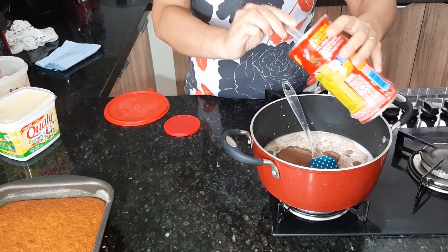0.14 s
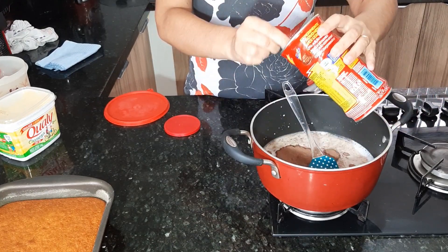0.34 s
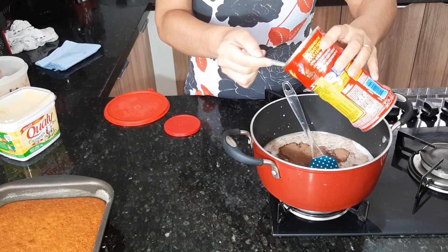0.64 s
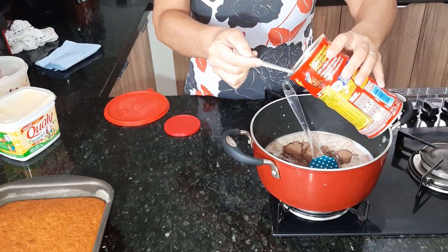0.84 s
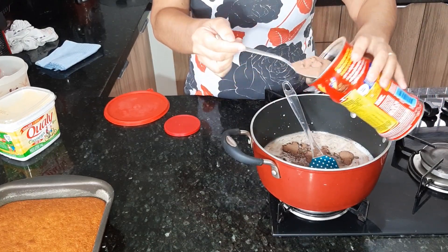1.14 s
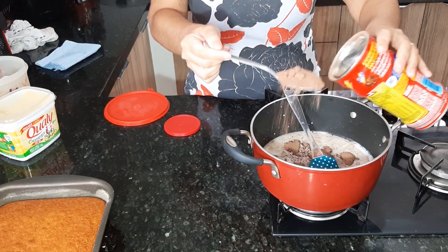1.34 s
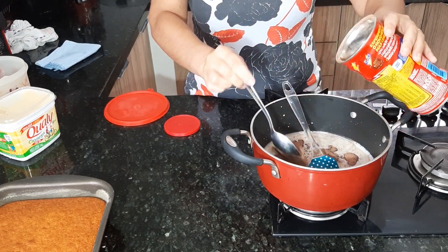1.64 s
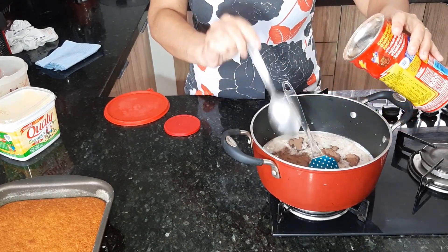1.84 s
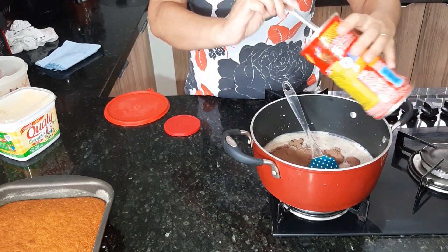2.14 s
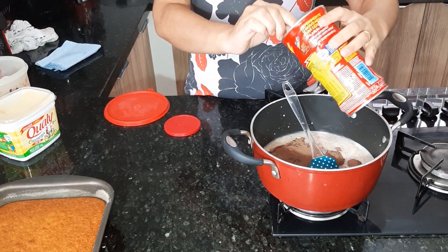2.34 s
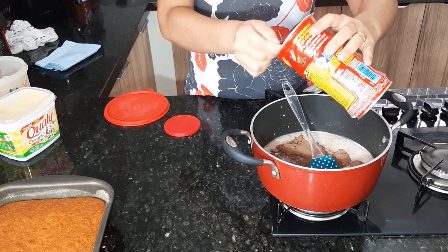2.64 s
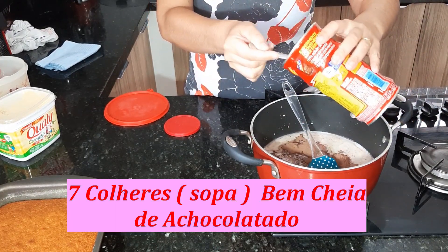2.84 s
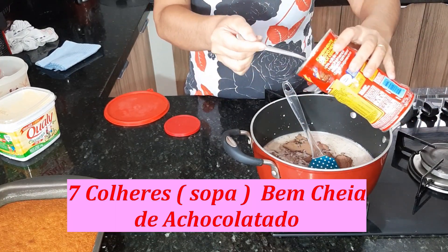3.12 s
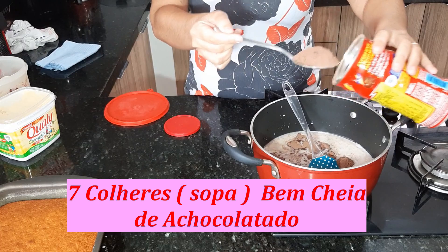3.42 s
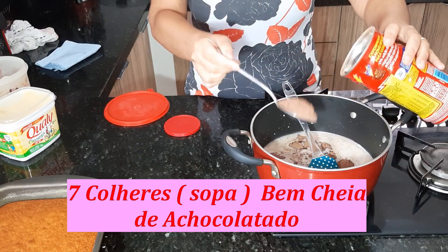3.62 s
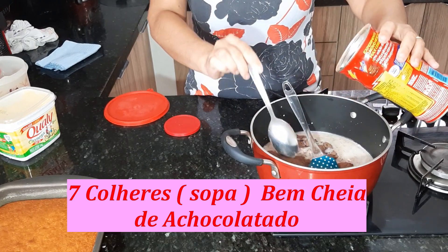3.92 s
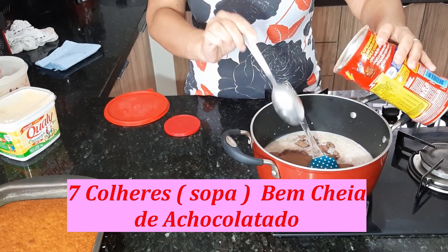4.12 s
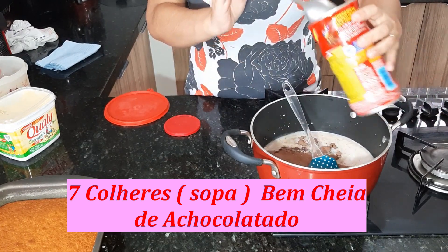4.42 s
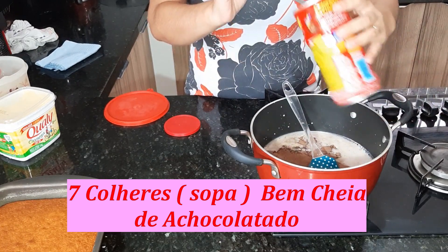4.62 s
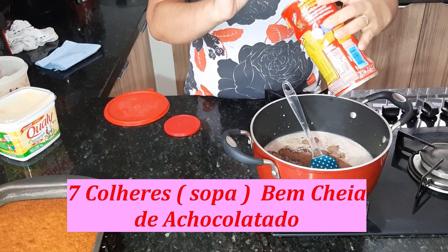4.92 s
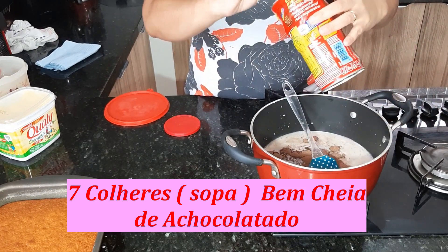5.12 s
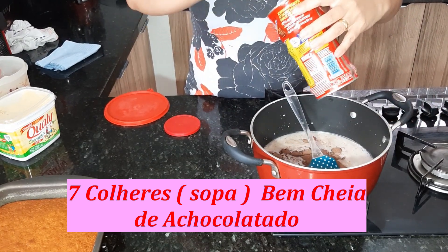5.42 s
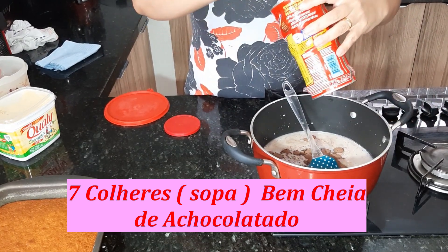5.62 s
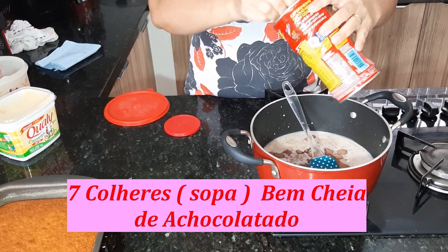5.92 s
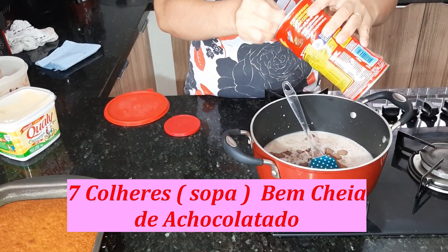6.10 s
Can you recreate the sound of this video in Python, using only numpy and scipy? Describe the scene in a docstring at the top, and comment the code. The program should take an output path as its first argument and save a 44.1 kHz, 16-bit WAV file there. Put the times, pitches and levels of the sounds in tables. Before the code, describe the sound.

A steel spoon digs crunchy powder from a hand-held tin, knocks its base, pauses, clinks once, and scoops again in a humming kitchen.

```python
"""A steel spoon digs cocoa powder out of a hand-held tin in a hard-walled kitchen.
It crunches through the powder and knocks the wall, then the base, and digs again.
After a pause it clinks once on the way in, touches the rim, and digs on to the end.
Touches and grains of friction drive the resonances of tin and spoon; a synthetic room response rings after each.
Filtered noise and a wavering sine make the room air and the humming appliance underneath."""
import sys
import numpy as np
from scipy import signal
from scipy.fft import rfft, irfft, next_fast_len
from scipy.io import wavfile
from scipy.ndimage import uniform_filter1d

SR = 44100
rng = np.random.default_rng(int(sys.argv[2]) if len(sys.argv) > 2 else 0)


def unload_wav(signal):
    """Save mono or channel-first audio to the path in sys.argv[1] as 16-bit WAV at rate SR, clipped to [-1, 1]."""
    wavfile.write(
        sys.argv[1],
        SR,
        np.round(np.clip(np.atleast_2d(signal).T, -1, 1) * 32767).astype(np.int16),
    )


N = 276058
TIME = np.arange(N) / SR
SWING_S = 0.00692  # the thump of the base comes this long after the tick

# tin resonances: centre_hz, width_hz, level_db
TIN_MODES = [(137, 14, -16), (212, 30, -5), (366, 35, -9), (418, 45, -3), (484, 45, 0), (562, 30, -11),
             (680, 40, -9), (800, 35, -14), (895, 30, -7), (945, 50, -8), (1120, 45, -17), (1425, 50, -11),
             (1670, 40, -12), (1850, 80, -22), (1988, 22, -12), (2065, 35, -9), (2200, 60, -16),
             (2420, 60, -23), (2970, 50, -19), (3355, 36, -6), (3490, 55, -13)]
# spectrum of crunching powder: freq_hz, density_db_per_hz
POWDER_SPECTRUM = [(710, -6), (1200, -2), (1380, -9), (2030, -8.5), (2490, -12.5), (2870, -3), (3480, -2.5),
                   (4230, -6.5), (4710, -7), (6780, -4), (8230, -12), (12900, -5), (15700, -8)]
# spectrum of a sharp crack: freq_hz, density_db_per_hz
CRACK_SPECTRUM = [(300, -9), (1150, 2.5), (1800, 1), (2600, 2), (3400, -1), (4300, -1), (5600, 0),
                  (6800, -3), (8500, -10), (15500, -8.5)]


def undb(db):
    """Decibels to gain."""
    return 10 ** (np.asarray(db) / 20)


def unit(x):
    """Scale to rms 1."""
    return x / np.sqrt(np.mean(x ** 2) + 1e-20)


def burst(x, db):
    """Scale a short sound so that its energy equals 20 ms at this rms level."""
    energy = np.sum(x ** 2)
    return x * undb(db) * np.sqrt(SR / 50 / energy)


def at_hz(points, hz):
    """Interpolate (Hz, value) points on a log-frequency axis."""
    point_hz, value = np.transpose(points)
    return np.interp(np.log(hz + 1e-3), np.log(point_hz), value)


def colour(x, points):
    """Minimum-phase filter with the given (Hz, dB) response, built by folding the cepstrum."""
    size = next_fast_len(x.shape[-1] + 4096, True) // 2 * 2
    response_db = at_hz(points, np.fft.rfftfreq(size, 1 / SR))
    cepstrum = irfft(np.log(undb(response_db)))
    cepstrum[1:size // 2] *= 2
    cepstrum[size // 2 + 1:] = 0
    response = np.exp(rfft(cepstrum))
    return irfft(rfft(x, size) * response)[..., :x.shape[-1]]


def band(x, lo_hz, hi_hz):
    """Butterworth band-pass."""
    edges_hz = [lo_hz, min(hi_hz, SR / 2 - 1)]
    return signal.sosfilt(signal.butter(3, edges_hz, "band", fs=SR, output="sos"), x)


def ring(x, modes):
    """Drive parallel resonances: (centre_hz, width_hz, level_db)."""
    out = 0
    for hz, width_hz, db in modes:
        b, a = signal.iirpeak(hz, hz / width_hz, fs=SR)
        out = out + undb(db) * signal.lfilter(b, a, x)
    return out


def add(track, start_s, x):
    """Mix x into the track."""
    start = int(start_s * SR)
    track[start:start + len(x)] += x[:N - start]


def diffuse(size):
    """Stereo noise arriving from all sides: alike in the bass, nearly unrelated in the treble."""
    # freq_hz, left_right_correlation
    likeness = [(100, 0.95), (300, 0.82), (600, 0.61), (1200, 0.043), (15000, .01)]
    mid, side = rfft(rng.standard_normal((2, size)))
    alike = np.clip(at_hz(likeness, np.fft.rfftfreq(size, 1 / SR)), 0, 1)
    shared = mid * np.sqrt(1 + alike)
    opposed = np.outer([1, -1], side * np.sqrt(1 - alike))
    return irfft(shared + opposed, size) / np.sqrt(2)


def walk(rate_hz):
    """Smoothed random drift about zero, rms 1."""
    hold = int(SR / rate_hz)
    steps = np.repeat(rng.standard_normal(N // hold + 1), hold)
    return unit(uniform_filter1d(steps, hold)[:N])


def grains(size, rate_hz, spread_db):
    """Random tiny fractures, a few much larger than the rest, rms 1."""
    size_db = spread_db * np.minimum(rng.exponential(size=size), 5)
    pulses = undb(size_db) * rng.standard_normal(size)
    return unit(pulses * (rng.random(size) < rate_hz / SR))


def contact(chatter_s, chatter_db):
    """Force of one touch: a sharp blow plus a decaying buzz of the spoon against the metal."""
    t = TIME[:SR // 3]
    decay = np.exp(-t / max(chatter_s, 1e-3))
    chatter = burst(grains(len(t), 7000, 1.06) * decay, chatter_db)
    blow = burst(1. * (t == 0), 0)
    return chatter + blow


def sway(db, shake_s=0.066):
    """A blow leaves the tin shaking in the hand with a faint, deep wobble."""
    # whole tin in the hand: centre_hz, width_hz, level_db
    hand_mode = [(76, 13, 0)]
    shake = ring(contact(shake_s, chatter_db=17), hand_mode)
    return burst(band(shake, 55, 135), db)


def knocks(buzz_db=-6, grit_db=4, dull_db=-19, sway_db=-31):
    """Where the spoon lands sets how much the tin's base, air column, wall and rim each ring."""
    # spoon against tin: start_s, level_db, place
    knock_table = [(0.13, -41, "wall"), (0.294, -42.5, "powder"), (0.399, -40, "powder"),
                   (0.5, -42.5, "powder"), (0.56, -43.5, "powder"), (0.624, -40.5, "graze"),
                   (1.133, -26.5, "base"), (1.191, -32, "base"), (1.344, -48.5, "graze"),
                   (2.301, -49.5, "powder"), (2.428, -49, "wall"), (2.542, -47.5, "powder"),
                   (2.572, -46, "wall"), (2.723, -44, "graze"), (5.113, -49.5, "graze"),
                   (5.251, -35, "rim"), (5.925, -43.5, "powder"), (6.019, -39.5, "powder"),
                   (6.055, -37, "wall"), (6.096, -43, "wall")]
    # tin's answer by place: boom_db, base_thump_db, air_column_db, wall_ring_db, rim_ring_db,
    # crack_db, chatter_s (contact() holds it to 1 ms or more)
    place_table = {"powder": (-18, 0, -4, -31, -30, -9, -0.04),
                   "wall": (-19.5, -4.5, -1, -31.5, -34, -2.5, 0.06),
                   "base": (-11.5, 0, -9.5, -13, -21, -12.5, -0.01),
                   "rim": (-18, -2.5, 1.5, -1.5, -3, -7.5, -0.07),
                   "graze": (-21, -11, -12, -18.5, -12.5, -1.5, 0.02)}
    regions_hz = [(135, 270), (340, 590), (600, 1300), (1300, 2600), (2600, 3800)]
    lags_s = [SWING_S, SWING_S, 0, 0, 0]
    out = np.zeros(N)
    for start_s, level_db, place in knock_table:
        *shares_db, crack_db, chatter_s = place_table[place]
        force = contact(chatter_s, buzz_db)
        # hand and powder deaden the tin: a dull knock lies under its modes
        tin = ring(force, TIN_MODES) + undb(dull_db) * band(force, 350, 1100)
        for (lo_hz, hi_hz), share_db, lag_s in zip(regions_hz, shares_db, lags_s):
            add(out, start_s + lag_s, burst(band(tin, lo_hz, hi_hz), level_db + share_db))
        crack = colour(contact(chatter_s, grit_db), CRACK_SPECTRUM)
        add(out, start_s, burst(crack, level_db + crack_db))
        add(out, start_s, sway(level_db + sway_db))
    return out


def clinks(sway_db=-27, grip_hz=105):
    """The empty spoon rings off the rim while the tin answers low and sways in the hand."""
    # spoon bowl on rim: start_s, spoon_ring_db, clank_db, tin_thump_db
    clink_table = [(4.435, -33, -34.5, -32.5)]
    # spoon resonances before the grip: centre_hz, width_hz, level_db
    spoon_modes = [(1570, 200, 0), (1770, 98, -2), (2670, 340, -5.5), (3320, 250, -1), (3760, 150, -17),
                   (4480, 86, -20), (5100, 100, -8), (5940, 78, -5), (6630, 70, -2.5), (7400, 100, -1),
                   (9000, 60, -22), (9500, 420, -14)]
    # dense cluster of overtones: freq_hz, density_db_per_hz
    clank_spectrum = [(500, -0.5), (1100, -2.5), (1500, 0.5), (2400, -6), (4200, -1.5), (4800, -14),
                      (8000, -8), (9500, -5.5), (13000, -0.5), (15500, -4)]
    # the fingers damp: no mode is narrower than grip_hz
    held_modes = [(hz, max(width_hz, grip_hz), db) for hz, width_hz, db in spoon_modes]
    out = np.zeros(N)
    for start_s, spoon_db, clank_db, thump_db in clink_table:
        force = contact(0.0067, chatter_db=6.5)
        spoon = burst(ring(force, held_modes), spoon_db)
        clank = burst(colour(contact(0.02, chatter_db=13), clank_spectrum), clank_db)
        add(out, start_s, spoon + clank)
        tin = ring(force, TIN_MODES) + undb(-7) * force
        add(out, start_s + SWING_S, burst(band(tin, 430, 660), thump_db))
        add(out, start_s, sway(thump_db + sway_db))
    return out


def push(start_s, length_s, attack_s=0.0094, release_s=0.0077):
    """Effort of one push: it sets in quickly, holds, and lets go."""
    t = TIME - start_s
    onset = np.clip(t / attack_s, 0, 1)
    return onset * np.exp(-np.maximum(t - length_s, 0) / release_s)


def digging(hiss_db=-2, rasp_db=-3, rumble_db=-2, grit_db=-1, fits_db=4.5, dull_db=4):
    """Powder crunches in fits and starts: fine grains hiss and rasp, coarser slips shake the tin."""
    # pushes through the powder: start_s, length_s, level_db, extra_hiss_db
    stroke_table = [(0.209, 0.077, -53.5, 2), (0.353, 0.19, -54, 4.5), (0.507, 0.073, -50, -2),
                    (2.303, 0.059, -54.5, 5), (2.5, 0.11, -53, 1), (2.624, 0.14, -51.5, 0),
                    (2.802, 0.08, -59.5, 5), (5.13, 0.16, -63, 2), (5.353, 0.036, -49.5, -3),
                    (5.528, 0.28, -59.5, -2), (5.811, 0.073, -51.5, 2), (5.887, 0.085, -46.5, 1.5),
                    (6.06, 0.044, -50, 3), (6.138, 0.066, -59, 6)]
    hiss = unit(band(colour(grains(N, 5000, 2.8), POWDER_SPECTRUM), 7500, 18000))
    rasp = unit(band(colour(grains(N, 2000, 3.2), POWDER_SPECTRUM), 1300, 7500))
    # sugar crystals crack under the edge, sparser than the powder
    crystals = unit(colour(grains(N, 110, 1.5), CRACK_SPECTRUM))
    slips = grains(N, 800, 3.)
    shaken = ring(slips, TIN_MODES) + undb(dull_db) * slips
    rumble = unit(band(shaken, 230, 1250))
    scrape = undb(rasp_db) * rasp + undb(grit_db) * crystals + undb(rumble_db) * rumble
    out = np.zeros(N)
    for start_s, length_s, level_db, extra_hiss_db in stroke_table:
        crunch = scrape + undb(extra_hiss_db + hiss_db) * hiss
        out += push(start_s, length_s) * undb(level_db) * crunch
    return out * undb(fits_db * walk(90))


def spurts(fade_s=0.006):
    """A lump of powder gives way: a short, dense crunch of decaying grains."""
    # lumps: start_s, rasp_level_db, hiss_over_rasp_db
    slip_table = [(0.529, -48.5, 6), (0.622, -56, 13.5), (0.766, -78, 22.5), (1.269, -49, 3),
                  (2.365, -49, -3), (2.701, -48, -4), (2.802, -47, 1.5), (5.45, -55, 0),
                  (5.897, -50.5, 12.5), (6.086, -42, 2)]
    out = np.zeros(N)
    t = TIME[:SR // 4]
    for start_s, rasp_db, hiss_over_rasp_db in slip_table:
        fractures = grains(len(t), 3500, 2.5) * np.exp(-t / fade_s)
        crunch = colour(fractures, POWDER_SPECTRUM)
        add(out, start_s, burst(band(crunch, 8800, 25000), rasp_db + hiss_over_rasp_db))
        add(out, start_s, burst(band(crunch, 1300, 8700), rasp_db))
    return out


def chirps(width_hz=130, fade_s=0.0081):
    """The spoon's edge on the wall: for a moment stick and slip settles on one resonance."""
    # chirps: start_s, pitch_hz, level_db
    chirp_table = [(2.434, 1170, -51), (2.518, 1300, -57), (2.685, 1105, -47.5), (2.691, 4710, -49),
                   (5.837, 3200, -52), (6.091, 875, -41)]
    out = np.zeros(N)
    t = TIME[:SR // 4]
    for start_s, pitch_hz, level_db in chirp_table:
        rub = grains(len(t), 2100, 3.9) * np.exp(-(t / fade_s) ** 2)
        add(out, start_s, burst(ring(rub, [(pitch_hz, width_hz, 0)]), level_db))
    return out


def kitchen(x, gap_s=0.0011, early_db=3, early_s=0.0063, counter_gain=0.053, counter_s=0.0023):
    """Direct sound, a bounce off the stone counter, then dense, decaying wall reflections."""
    # reverberation time: freq_hz, t60_s
    room_t60 = [(100, 0.42), (500, 0.56), (2000, 0.62), (6000, 0.53), (15000, 0.51)]
    # tail over direct sound, before gap and early boost: freq_hz, level_db
    room_share = [(100, 14), (500, 1), (1500, 5), (5000, 6), (15000, 5.5)]
    t = TIME[:SR * 3 // 4]
    hz, when_s, cells = signal.stft(diffuse(len(t)), SR, nperseg=256)
    t60_s = at_hz(room_t60, hz)[:, None]
    # the root factor gives every band's decay the same energy
    decay = np.exp(-np.log(1000) * when_s / t60_s) * np.sqrt(2 * np.log(1000) / t60_s / SR)
    share = undb(at_hz(room_share, hz))[:, None]
    tail = signal.istft(cells * decay * share, SR)[1][:, :len(t)]
    early_boost = undb(early_db * np.exp(-t / early_s))
    response = tail * np.clip(t / gap_s - .5, 0, 1) * early_boost
    # the tin is held to the right: sound reaches the left 6 samples later
    for channel, lag in enumerate([6, 0]):
        response[channel, lag] += 1
        response[channel, lag + int(counter_s * SR)] += counter_gain
    return signal.fftconvolve(x[None], response, axes=1)[:, :N] / 2


def appliance(air_db=-62.5, hum_hz=295.2, hum_db=-61, waver_db=0.84):
    """A motor hums (wavering sine) and whirrs (noise bands) over the soft rush of room air."""
    # room air: freq_hz, density_db_per_hz
    air_spectrum = [(18, -65), (30, -26), (59, -20.5), (264, -9.5), (301, -8.5), (325, -17), (434, -14),
                    (564, -20.5), (1000, -24.5), (1530, -26.5), (1830, -32.5), (4960, -47), (6440, -45),
                    (9300, -50), (13200, -43.5), (14900, -36)]
    # steady whirr: centre_hz, width_hz, level_db
    whirr_bands = [(71.6, 21, -76.5), (137.8, 16.3, -74.5), (211, 7.8, -80), (907, 250, -72.5),
                   (1814, 190, -77.5), (6520, 630, -87.5)]
    air = undb(air_db + 0.084 * walk(14)) * unit(colour(diffuse(N), air_spectrum))
    whirr = 0
    for hz, width_hz, db in whirr_bands:
        whirr = whirr + undb(db) * unit(band(diffuse(N), hz - width_hz / 2, hz + width_hz / 2))
    phase_rad = 2 * np.pi * hum_hz * TIME + 0.067 * walk(27)
    hum = np.sqrt(2) * np.sin(phase_rad) * undb(hum_db + waver_db * walk(3.157))
    return air + whirr + hum


def scene():
    """Spoon and tin in the kitchen, over the appliance."""
    touches = knocks() + clinks() + digging() + spurts() + chirps()
    return kitchen(touches) + appliance()


def record(dry):
    """The phone cuts the deep bass and the very top."""
    high_pass = signal.butter(3, 45, "high", fs=SR, output="sos")
    low_pass = signal.ellip(10, .2, 70, 15800, fs=SR, output="sos")
    return signal.sosfilt(low_pass, signal.sosfilt(high_pass, dry))


dry = scene()
out = record(dry)
unload_wav(out)
```